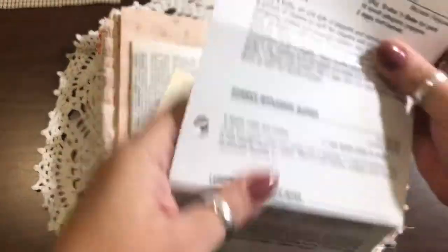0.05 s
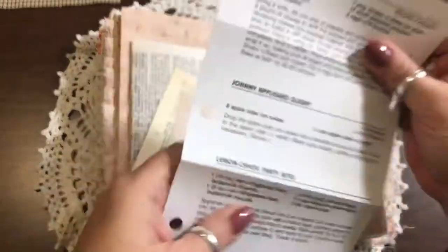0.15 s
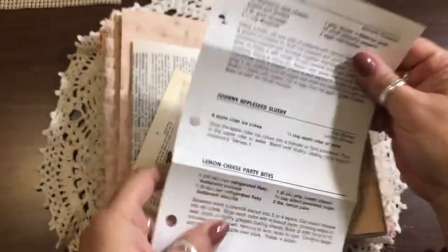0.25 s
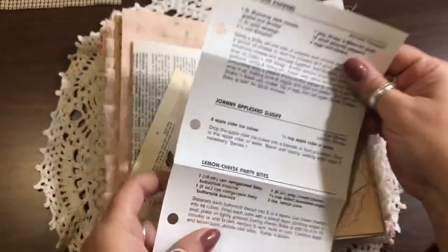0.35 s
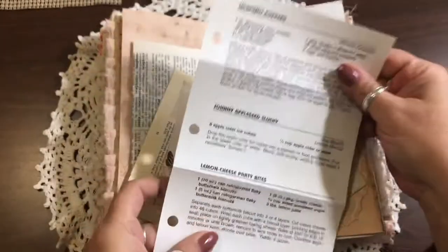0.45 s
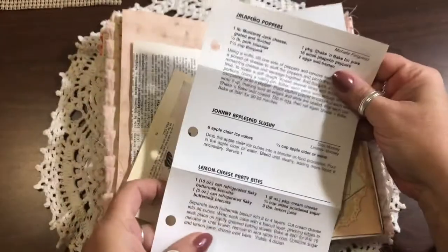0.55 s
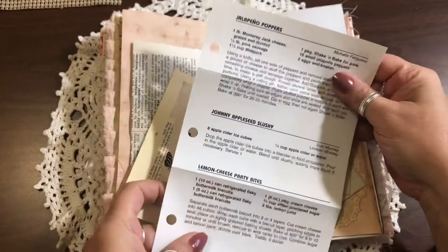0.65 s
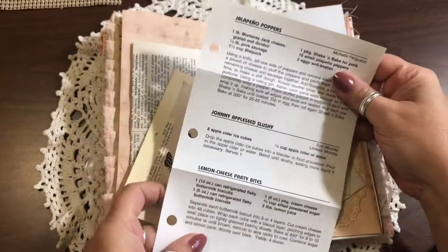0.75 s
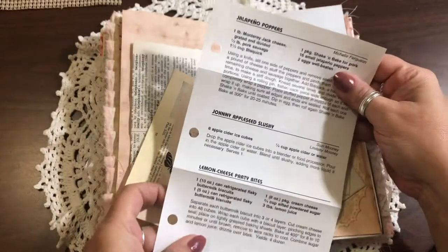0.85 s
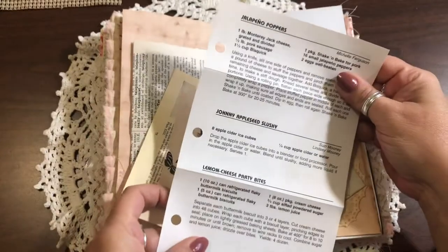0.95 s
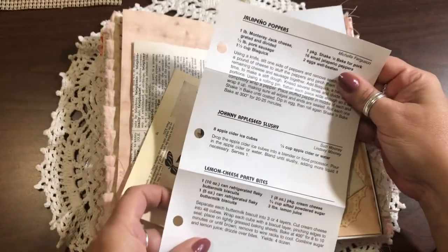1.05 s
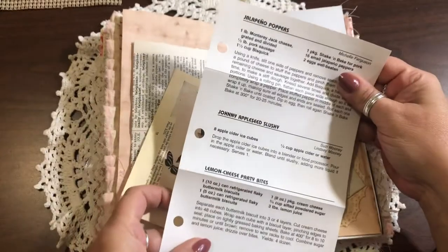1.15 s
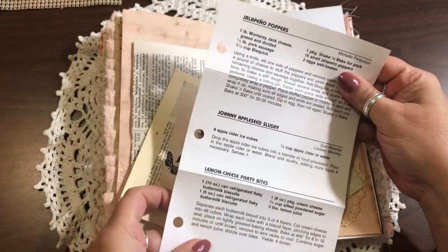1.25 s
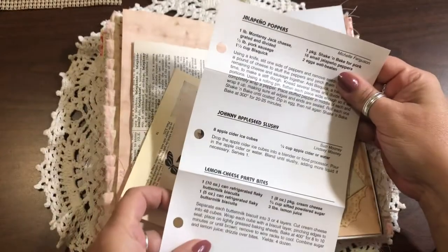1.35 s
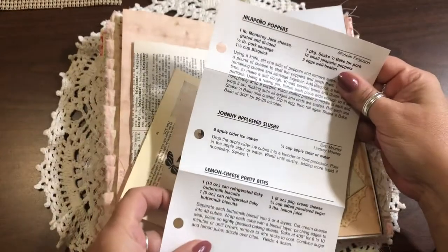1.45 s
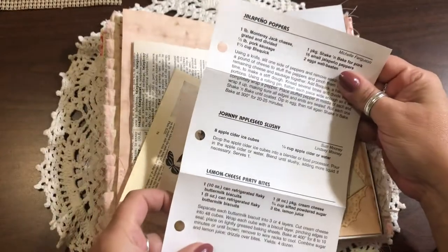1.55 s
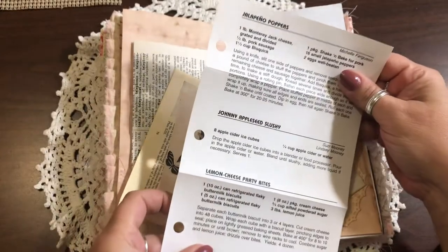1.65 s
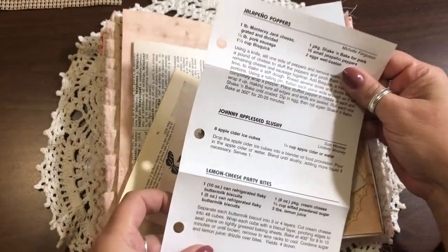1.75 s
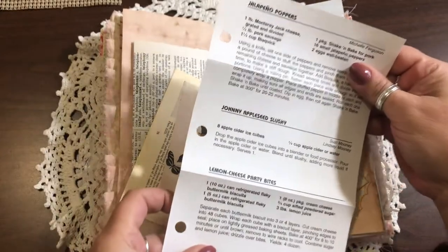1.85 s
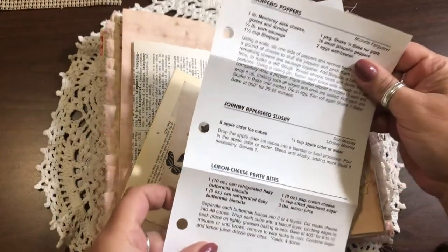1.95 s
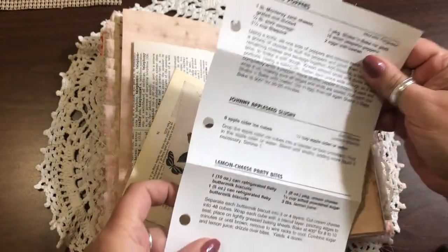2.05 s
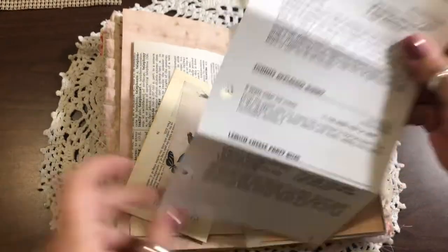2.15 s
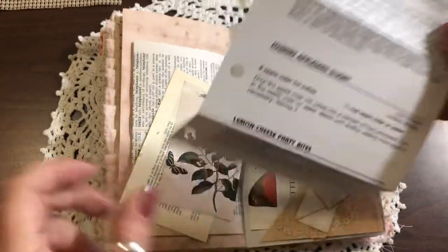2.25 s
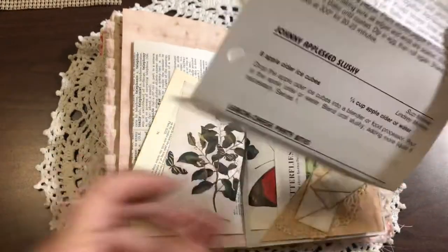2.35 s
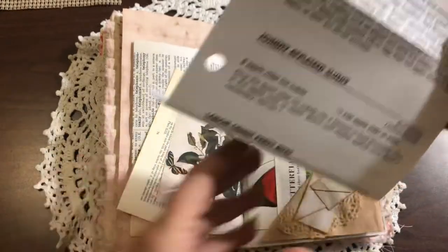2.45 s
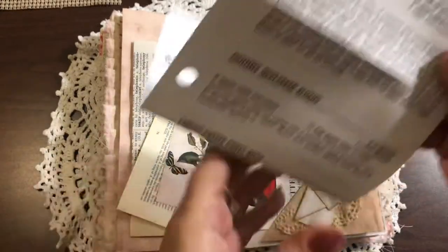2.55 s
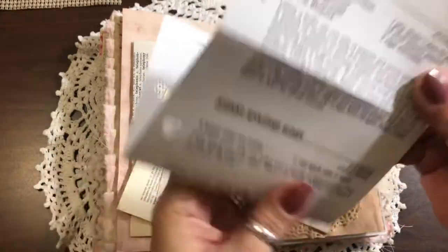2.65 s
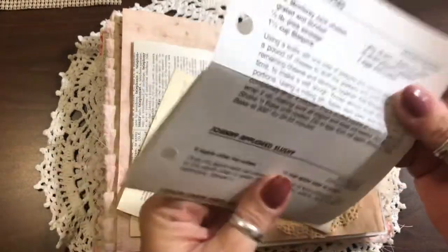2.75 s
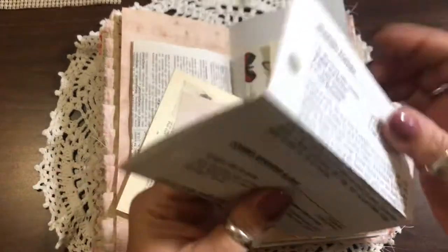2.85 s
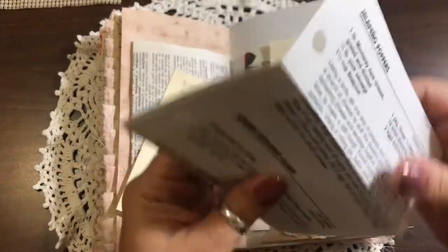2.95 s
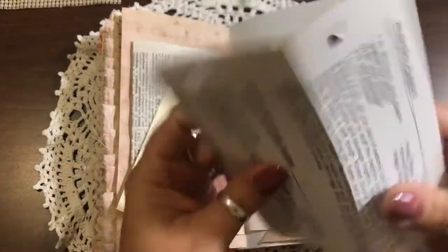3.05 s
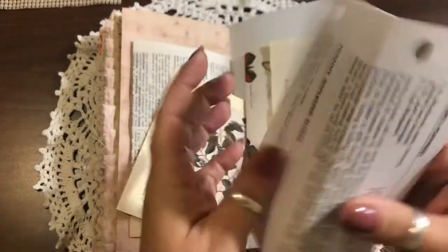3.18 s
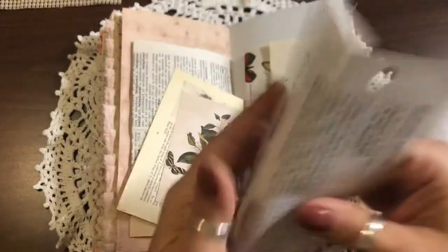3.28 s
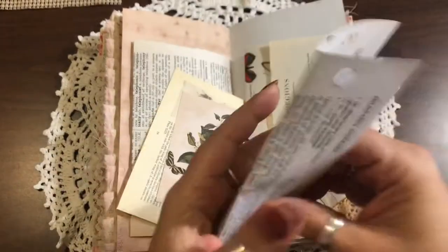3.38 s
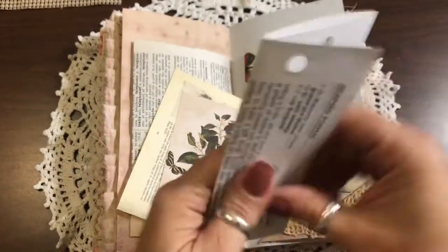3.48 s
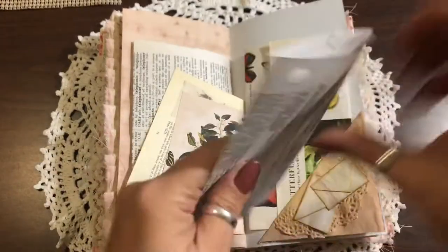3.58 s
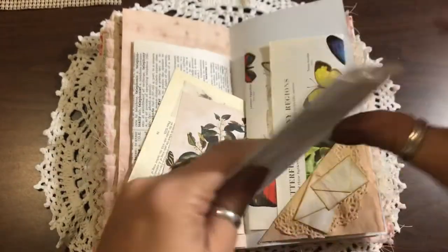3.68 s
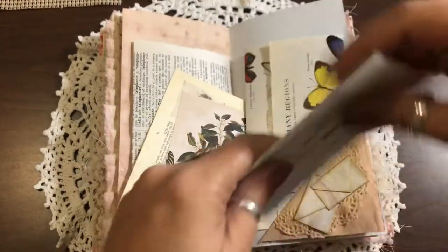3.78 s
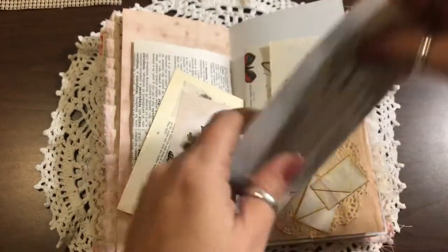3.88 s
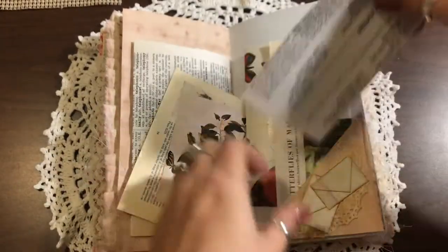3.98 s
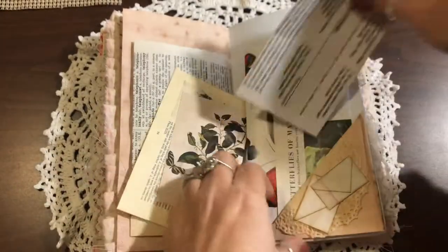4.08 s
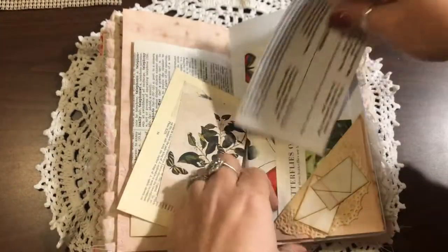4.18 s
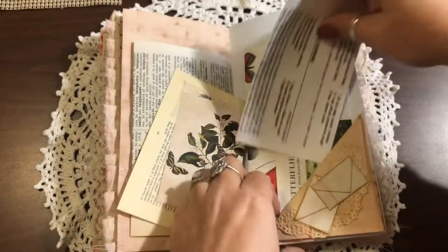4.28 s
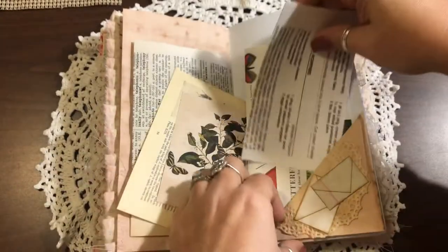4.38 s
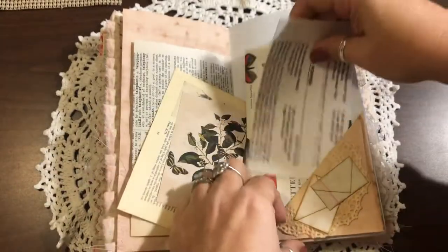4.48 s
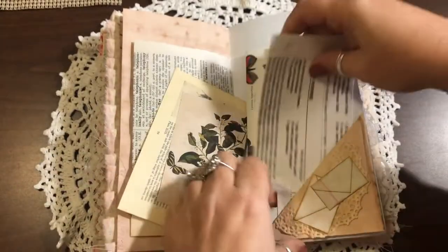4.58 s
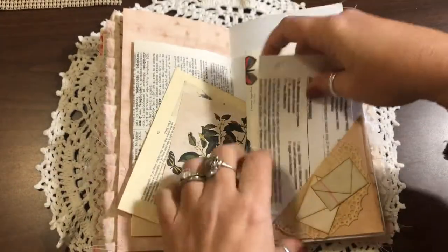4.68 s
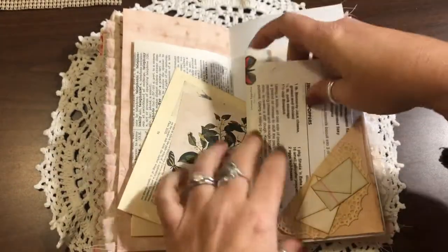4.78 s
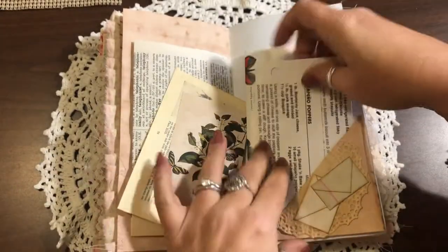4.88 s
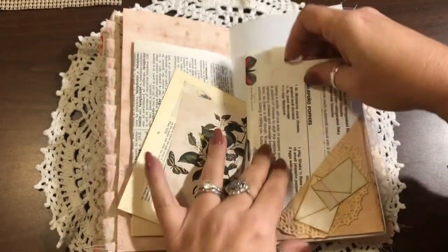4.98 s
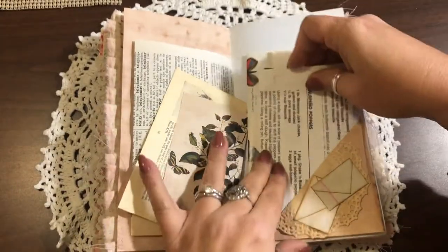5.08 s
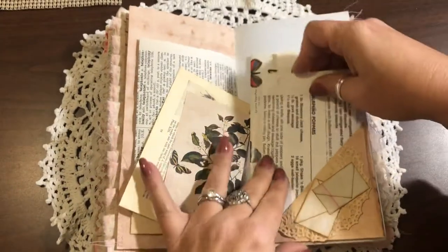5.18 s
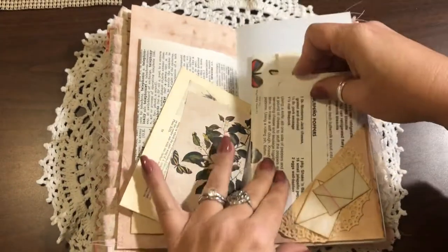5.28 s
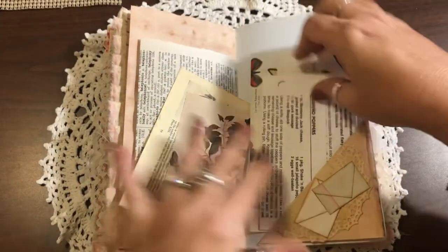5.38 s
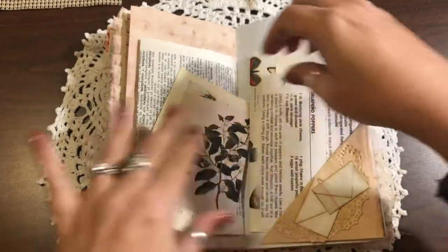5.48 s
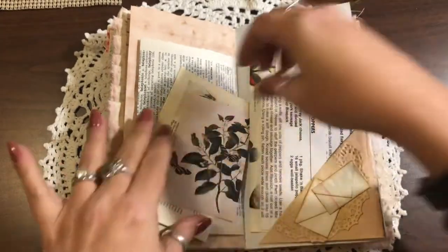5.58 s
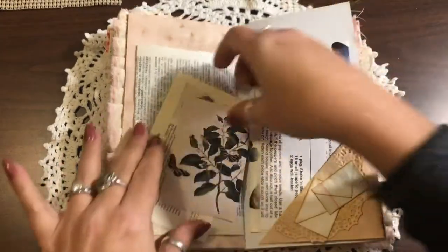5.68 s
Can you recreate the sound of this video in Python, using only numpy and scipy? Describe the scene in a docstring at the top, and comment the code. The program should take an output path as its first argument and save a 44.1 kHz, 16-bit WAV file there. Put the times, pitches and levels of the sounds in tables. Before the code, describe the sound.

A sheet of paper is lifted off a scrapbook with a hiss, a few flaps and soft hollow pops in the first half second. Faint rubbing fades to a lull from about 1 to 2 seconds, with a small tick near 1.8 seconds. From 2.1 seconds the sheet is flexed and folded, fluttering and crackling, and at 2.8 seconds a crease gives one sharp snap, the loudest sound. Busy flapping, crinkling and rubbing continue until about 3.6 seconds, then thin out, with a tap near 3.9. From about 4.2 to 4.8 seconds the folded sheet slides into a paper pocket with a dry, swelling scrape. Light fingertip taps and soft rubs follow around 5 seconds and die away by 5.7. Everything sounds close, in a small quiet room with a faint steady electrical hum.

```python
"""Paper hisses as a printed sheet is lifted off a scrapbook, then flexed, folded and slid into a pocket.
Stick-slip friction makes the hiss, and the pocket's resonances colour the closing scrape.
Buckling makes the sheet flutter, flap and pop; its creases crackle and one snaps through.
Fingertips and edges tap and tick. The table reflects it all, in a small quiet room with a faint mains hum."""
import sys
import numpy as np
from scipy import signal
from scipy.fft import rfft, irfft, next_fast_len
from scipy.io import wavfile
from scipy.ndimage import uniform_filter1d

SR = 44100
rng = np.random.default_rng(int(sys.argv[2]) if len(sys.argv) > 2 else 0)


def output_pcm(signal):
    """Save a mono or channel-first signal as 16-bit PCM at the path in sys.argv[1].

    Samples are clipped to [-1, 1] before scaling.
    """
    pcm = np.clip(np.atleast_2d(signal).T, -1, 1) * 32767
    wavfile.write(sys.argv[1], SR, np.round(pcm).astype(np.int16))


N = 252384
TIME = np.arange(N) / SR


def undb(db):
    """Amplitude ratio of a level in decibels."""
    return np.exp(np.asarray(db) * np.log(10) / 20)


def unit(x):
    """Normalisation to rms 1."""
    return x / np.sqrt(np.mean(x ** 2))


def fade(elapsed, t60):
    """Exponential decay: gain 1 until the elapsed time is 0, then 60 dB down every t60 seconds."""
    return np.exp(-np.log(1000) * np.maximum(elapsed, 0) / t60)


def colour(x, spectrum):
    """Spectral shaping by (frequency [Hz], gain [dB]) points, to rms 1."""
    hz, db = np.transpose(spectrum)
    size = next_fast_len(len(x), True)
    f = np.maximum(np.fft.rfftfreq(size, 1 / SR), 1)
    gain = undb(np.interp(np.log(f), np.log(hz), db))
    return unit(irfft(rfft(x, size) * gain, size)[:len(x)])


def ring(x, hz, width):
    """Second-order resonance with gain 1 at its centre."""
    hz = min(hz, SR / 3)
    w = 2 * np.pi * hz / SR
    a = np.sin(w) * width / hz / 2
    return signal.lfilter([a, 0, -a], [1 + a, -2 * np.cos(w), 1 - a], x)


def resonate(x, peaks):
    """Parallel filtering: the summed response of several ringing peaks."""
    return sum(undb(db) * ring(x, hz, width) for hz, width, db in peaks)


def soften(x, hz):
    """Contact compliance: a soft contact has little energy far above hz."""
    return signal.sosfilt(signal.butter(2, min(hz, .45 * SR), fs=SR, output="sos"), x)


def disperse(x, lag_s):
    """Dispersion of bending waves: low frequencies travel slower and arrive late (lag_s at 1 kHz)."""
    size = next_fast_len(len(x) + SR // 10, True)
    f = np.fft.rfftfreq(size, 1 / SR)
    phase = 4 * np.pi * lag_s * np.sqrt(1000 * f)
    return irfft(rfft(x, size) * np.exp(-1j * phase), size)[:len(x)]


def walk(rate):
    """Smooth random modulation of rms 1, with about `rate` turns a second."""
    hold = max(int(SR / rate), 1)
    steps = np.repeat(rng.standard_normal(N // hold + 1), hold)
    return unit(uniform_filter1d(steps, hold)[:N])


def slips(rate, scatter_db):
    """Poisson impulses: fibres catch and let go in uneven clicks, `rate` a second on average."""
    out = np.zeros(N)
    hit = rng.random(N) < rate / SR
    size, scatter = rng.standard_normal((hit.sum(), 2)).T
    out[hit] = size * undb(scatter_db * np.clip(scatter, -2, 2))
    return out


def add(track, sound, s, db):
    """Superposition of a short sound at time s, its loudest 10 ms at the given level."""
    start = int(s * SR)
    loudest = np.sqrt(uniform_filter1d(sound ** 2, SR // 100, mode="constant").max())
    track[start:start + len(sound)] += (sound * undb(db) / loudest)[:N - start]


def blow(hz, t60, tail_db, breadth, lag_s, sink, reach, give_s):
    """Transient excitation: paper gives way, then shivers lower. Breadth, sink and reach scale hz."""
    t = TIME[:SR // 4]
    force = (t == 0) + .18 * rng.standard_normal(len(t)) * np.exp(-t / give_s)
    hit = soften(ring(force, hz, breadth * hz), reach * hz)
    tremor = rng.standard_normal(len(t)) * fade(t, t60)
    shiver = soften(ring(tremor, sink * hz, breadth * hz), reach * sink * hz)
    return disperse(unit(hit) + undb(tail_db) * unit(shiver), lag_s)


# hand movements that rub paper on paper:
# (start [s], time to grip [s], length [s], level [dB], swell [dB], t60 [s], hiss over level [dB])
HAND_RUBS = [(0.0, 0.0027, 0.058, -49.3, 2.5, 0.48, -1.5), (0.122, 0.033, .13, -56.3, 1.5, .52, 3),
             (0.36, .015, 0.11, -63, -3, .4, -3.5), (0.494, .008, 0.13, -63, -4, .8, -4),
             (0.704, 0.066, 0.19, -65.3, -0.5, 0.43, -5), (2.034, .018, 0.058, -58.7, 6, 0.07, 3),
             (2.11, .003, 0.066, -45.5, 2.5, 0.04, -3.5), (2.2, .002, 0.028, -49.3, -2.5, 0.05, -1.5),
             (2.386, .01, 0.15, -67.5, 8, .08, -3), (2.553, .002, 0.022, -59, -4, .1, -7),
             (2.6, .025, 0.2, -55.5, 5, .3, -1.3), (2.768, .008, 0.049, -46, -3, 0.23, -1),
             (2.87, .01, 0.079, -63, 3, .2, 1), (2.96, .002, 0.13, -52, 4, 0.33, -2),
             (3.129, .01, 0.022, -51.5, 1.5, .17, -4), (3.231, 0.0026, 0.077, -48.5, 4.5, .2, -3),
             (3.324, .01, 0.083, -53.5, 1.5, .2, -4), (3.405, 0.0073, 0.066, -48, -2, 0.27, -2),
             (3.485, 0.013, 0.048, -50, 0, 0.14, 7.7), (3.679, .02, 0.054, -66, 5, 0.19, 3),
             (3.733, .015, 0.17, -61, 4, 0.31, 8.5), (4.985, .004, 0.06, -54.7, 2, .2, -6.5),
             (5.108, .04, .095, -54.3, -1, .24, -9), (5.25, .026, 0.086, -50.7, 1.5, 0.085, -1.3),
             (5.582, 0.011, 0.15, -64.5, 3, .2, -3)]
def friction_levels():
    """Incoherent sources add in power: rasp and hiss envelopes of rubs that grip, slide and fade."""
    rasp_power, hiss_power = np.zeros(N), np.zeros(N)
    for start, grip_s, length, db, swell_db, t60, hiss_db in HAND_RUBS:
        span = (TIME >= start) & (TIME < start + length + t60)
        t = TIME[span] - start
        attack = np.minimum(t / grip_s, 1)
        progress = np.minimum(t / length, 1)
        rub = attack * undb(db + swell_db * (progress - .5)) * fade(t - length, t60)
        rasp_power[span] += rub ** 2
        hiss_power[span] += (rub * undb(hiss_db)) ** 2
    return np.sqrt(rasp_power), np.sqrt(hiss_power)


# spectrum of sheet rubbing on sheet: (frequency [Hz], gain [dB])
RASP_SPECTRUM = [(200, -22.5), (550, -11.5), (800, -3.5), (1080, -11.5), (1550, 0.5), (2300, -2), (3200, 0),
                 (4500, -.5), (6500, -3.5), (8500, -10), (16000, -26)]
# spectrum of a scraping edge: (frequency [Hz], gain [dB])
HISS_SPECTRUM = [(3000, -27), (6000, -1.5), (8000, 0.5), (11000, -1.5), (15500, 0)]
def sliding(rasp_level, hiss_level):
    """Stick-slip friction: sheet on sheet gives a papery rasp, a scraping edge a high hiss."""
    grip = undb(1.1 * walk(45) + walk(260))
    friction = colour(slips(rate=20000, scatter_db=2) * grip, RASP_SPECTRUM)
    # resonances come and go as the sheet's curve and the contact point change
    rasp_modes = sum(.27 * walk(14) * ring(friction, hz, .23 * hz) for hz in np.geomspace(600, 12000, 11))
    rasp = unit(friction + rasp_modes)
    scrape = colour(slips(rate=14000, scatter_db=2.4) * grip, HISS_SPECTRUM)
    hiss_modes = sum(.35 * walk(14) * ring(scrape, hz, .13 * hz) for hz in np.geomspace(6000, 14000, 6))
    hiss = unit(scrape + hiss_modes)
    return rasp * rasp_level * undb(-1) + hiss * hiss_level * undb(.2)


def crinkling(rasp_level, rate=170, floor_db=-75):
    """Local buckling: small facets click at their own pitches, louder the harder the sheet is rubbed."""
    facets_hz = np.geomspace(1800, 11000, 9)
    cracks = sum(ring(slips(rate / len(facets_hz), scatter_db=3.5), hz, .2 * hz) / np.sqrt(hz)
                 for hz in facets_hz)
    effort = np.maximum(rasp_level, undb(floor_db))
    return unit(disperse(cracks, lag_s=.0003)) * effort * undb(-13.5)


# bends of the sheet: (time of deepest bend [s], level [dB], build-up t60 [s], decay t60 [s])
SHEET_BENDS = [(0.03, -45, 0.44, 0.55), (0.22, -59, 0.46, .75), (2.25, -50.5, .42, .33),
               (2.465, -48, .12, 0.52), (2.70, -51.5, 0.65, 0.26), (2.812, -44.5, 0.26, 0.19),
               (3.066, -43, .4, .31), (3.292, -44.5, 0.36, 0.2), (3.425, -46.5, 0.066, 0.49),
               (3.53, -52, .4, 0.27), (3.765, -54.5, 0.13, 0.23), (3.965, -58, .4, 0.21),
               (4.23, -62, .4, 0.27), (5.19, -62, 0.82, 0.43), (5.66, -68, .6, .9)]
# spectrum of the flutter: (frequency [Hz], gain [dB])
FLUTTER_SPECTRUM = [(30, -15), (60, -2), (100, 1), (150, 1), (250, 1), (400, -2.5), (560, -0.5), (750, -3),
                    (1100, -14.5), (2000, -25.5), (5000, -45.5)]
def flexing(rasp_level, held_db=-76, drag_db=-18.5):
    """Flexural vibration: soft bucklings stir the low, broad modes as the sheet is bent or dragged."""
    power = undb(held_db) ** 2 + (undb(drag_db) * rasp_level) ** 2
    for s, db, build_s, decay_s in SHEET_BENDS:
        span = (TIME > s - build_s) & (TIME < s + decay_s)
        t = TIME[span] - s
        power[span] += (undb(db) * fade(-t, build_s) * fade(t, decay_s)) ** 2
    flutter = disperse(slips(rate=1500, scatter_db=2.5), lag_s=.001204)
    return colour(flutter, FLUTTER_SPECTRUM) * np.sqrt(power) * undb(-1.5)


# spectrum of still room air: (frequency [Hz], gain [dB])
AIR_SPECTRUM = [(25, -17.5), (55, -1), (90, -2), (170, -4), (250, -6), (500, -12), (1200, -13), (2000, -20),
                (4000, -23.5), (8000, -26), (15500, -29.5)]
def background(air_db=-69.5, hum_hz=119.7, hum_db=-67.6):
    """Ambient noise floor: broadband room air and a mains hum, both wavering slightly in level."""
    air = colour(rng.standard_normal(N), AIR_SPECTRUM) * undb(air_db + .5 * walk(4.7))
    hum = np.sqrt(2) * np.sin(2 * np.pi * hum_hz * TIME) * undb(hum_db + .87 * walk(3.5))
    return air + hum


# flaps of the sheet: (time [s], relative level [dB], centre [Hz])
SHEET_FLAPS = [(0.014, -40.5, 660), (0.043, -46.5, 520), (0.152, -47.5, 450), (0.202, -39.5, 1000),
               (0.238, -46, 1050), (0.246, -47, 760), (0.637, -61.5, 350), (2.091, -52.5, 900),
               (2.243, -44, 900), (2.334, -56, 720), (2.425, -41, 290), (2.435, -38, 1200),
               (2.486, -49.5, 950), (2.797, -39, 380), (2.998, -41.5, 560), (3.027, -44.5, 290),
               (3.065, -39, 950), (3.085, -46, 600), (3.236, -48, 360), (3.261, -48, 600),
               (3.276, -45.5, 290), (3.304, -42.5, 560), (3.418, -40.5, 650), (3.45, -47, 600),
               (3.489, -50, 300), (3.551, -53, 470), (3.764, -50, 320), (3.782, -56, 400),
               (3.977, -60, 250), (4.041, -55, 450), (4.205, -56, 820), (4.768, -56, 600),
               (4.952, -58, 260), (4.987, -54.5, 800)]
# low modes of the held sheet: (frequency [Hz], bandwidth [Hz], gain [dB])
HELD_MODES = [(258, 110, -1), (525, 80, -8), (620, 60, -10), (737, 80, -8)]
def flapping():
    """Modal response: a flap moves the whole sheet, which answers in its broad drum-like modes."""
    direct = np.zeros(N)
    for s, db, hz in SHEET_FLAPS:
        flap = blow(hz, t60=.085, tail_db=3.5, breadth=1, lag_s=.0013, sink=.91, reach=1.82, give_s=.0017)
        add(direct, flap, s, db)
    return undb(-2.5) * (direct + resonate(direct, HELD_MODES))


# pops of the cupped sheet: (time [s], level [dB], pitch [Hz], t60 [s])
HOLLOW_POPS = [(0.04, -46, 500, .08), (0.154, -43.5, 430, .08), (0.204, -45.5, 420, .08),
               (0.248, -50, 630, .08), (2.218, -49, 520, .14), (2.244, -41.5, 560, .06),
               (2.266, -52, 520, .14), (2.428, -42, 730, .06), (3.05, -45, 530, .08),
               (3.075, -47, 610, .07), (3.168, -55, 450, .08), (3.451, -50, 530, .06)]
def popping(width_hz=150, sag=.08):
    """Cavity resonance: air under the popping sheet rings hollow; the pitch sags as the sheet relaxes."""
    out, t = np.zeros(N), TIME[:SR // 4]
    for s, db, hz, t60 in HOLLOW_POPS:
        pitch = hz * (1 - sag * (1 - fade(t, t60)) + sag / 2)
        attack = 1 - np.exp(-t / .001)
        note = np.sin(2 * np.pi * np.cumsum(pitch) / SR) * fade(t, t60 / 2) * attack
        flutter = ring(rng.standard_normal(len(t)) * fade(t, t60), hz, width_hz)
        add(out, unit(note) + undb(-3) * unit(ring(flutter, hz, 2 * width_hz)), s, db)
    return out


# strokes along the paper: (start [s], end [s], level [dB], centre [Hz], bandwidth [Hz])
PATCH_STROKES = [(0.13, 0.385, -55.5, 5750, 1250), (0.26, 0.76, -67, 1200, 1400),
                 (0.27, 0.72, -66.8, 6050, 1000), (0.66, 1.05, -66.5, 1100, 1400),
                 (0.70, 0.968, -65.5, 6160, 1200), (1.382, 1.558, -72, 1200, 1200),
                 (2.098, 2.256, -54.5, 650, 500), (3.872, 4.003, -60, 1200, 1200),
                 (3.923, 3.983, -52, 5200, 1400), (4.047, 4.3, -67, 810, 300), (3.99, 4.5, -63, 1700, 550),
                 (4.09, 4.3, -64, 5800, 2000), (4.25, 4.37, -62, 6900, 1600), (4.43, 4.53, -59, 8600, 2500),
                 (4.71, 4.78, -58, 8800, 2500), (4.92, 5.42, -63.5, 1300, 1300),
                 (4.697, 4.97, -60.5, 3160, 1200), (5.426, 5.725, -73, 1100, 1400)]
def strokes():
    """Forced resonance: a chattering fingertip or edge rings the patch under it in a whispering band."""
    out = np.zeros(N)
    for start, end, db, hz, width in PATCH_STROKES:
        arch = np.sin(np.pi * np.clip((TIME - start) / (end - start), 0, 1))
        patch = ring(slips(rate=9000, scatter_db=2), hz, width)
        out += undb(db) * arch * unit(ring(patch, hz, 2 * width))
    return out


# creases and edges giving way: (time [s], relative level [dB], centre [Hz])
CREASE_CRACKS = [(0.202, -50.5, 3500), (2.112, -51, 3100), (2.201, -49, 3500), (2.4235, -42.5, 3400),
                 (2.429, -38.5, 1640), (2.612, -59, 5700), (2.642, -54, 3400), (2.669, -47, 3750),
                 (2.69, -51, 4050), (2.759, -42, 2400), (2.775, -40, 4300), (2.781, -44, 1600),
                 (2.808, -43, 3500), (2.827, -41, 2050), (2.962, -56, 7000), (2.998, -46, 1700),
                 (2.999, -42, 6400), (3.067, -44.5, 1750), (3.144, -51, 4500), (3.232, -48, 3200),
                 (3.259, -37.5, 6000), (3.262, -41, 3000), (3.283, -45, 5500), (3.308, -48, 2000),
                 (3.417, -41.5, 4500), (3.419, -45, 1700), (3.484, -46, 3800), (3.521, -48, 3000),
                 (3.756, -53, 4500), (3.764, -51, 7000), (4.042, -56, 2300)]
def crackling(facet_db=1.5):
    """Impulse excitation: a crease gives with a broad crack and the facet beside it rings."""
    out = np.zeros(N)
    for s, db, hz in CREASE_CRACKS:
        crack = blow(hz, t60=.045, tail_db=3, breadth=1.6, lag_s=.0005, sink=.81, reach=2.77, give_s=.0036)
        add(out, crack + undb(facet_db) * ring(crack, hz, .12 * hz), s, db)
    return undb(-1) * out


# an edge flicks off a nail or another edge: (time [s], level [dB], bright crack over ring [dB])
EDGE_FLICKS = [(1.7672, -51.5, -3), (1.783, -56.5, 7), (2.4235, -49, 0), (2.482, -53, 3), (2.999, -47, 9),
               (3.2595, -41, 8), (4.084, -60.5, 4), (5.096, -67, 3), (5.196, -61, 8), (5.34, -55, 5)]
# modes of the flicked edge: (frequency [Hz], bandwidth [Hz], gain [dB])
FLICK_MODES = [(1500, 400, -6), (2450, 200, 0), (3500, 400, 2), (4300, 400, -2)]
def ticks(give_s=.001, shiver_t60=.2, shiver_db=-12):
    """Free vibration: a released edge cracks brightly, rings briefly and sets the sheet shivering."""
    out, t = np.zeros(N), TIME[:SR // 4]
    impulse = unit(1. * (t == 0))
    for s, db, bright_db in EDGE_FLICKS:
        crack = unit(rng.standard_normal(len(t)) * np.exp(-t / give_s))
        shiver = undb(shiver_db) * unit(rng.standard_normal(len(t)) * fade(t, shiver_t60))
        edge = unit(resonate(impulse + shiver, FLICK_MODES))
        bright = unit(ring(crack + shiver, hz=9000, width=20000))
        add(out, edge + undb(bright_db) * bright, s, db)
    return out


# the snap of the fold: (time [s], level [dB], rise constant [s], fall constant [s])
FOLD_SNAP = (2.7978, -24.0, .0027, .0012)
# ringing, comb-like peaks that colour the snap: (frequency [Hz], bandwidth [Hz], gain [dB])
SNAP_PEAKS = [(2000, 160, 0), (3380, 360, 8.5), (3970, 240, 3.5), (4520, 340, 0.5), (5680, 280, 1),
              (6210, 310, 1.5), (7700, 400, -9)]
def snap(lead_s=.01):
    """Snap-through instability: tiny bucklings pile up until the fold jumps in one ringing crack."""
    s, db, rise_s, fall_s = FOLD_SNAP
    lead = round(lead_s * SR)
    t = TIME[:6 * lead] - TIME[lead]
    avalanche = rng.choice([-1., 1.], len(t)) * np.exp(np.minimum(t / rise_s, -t / fall_s))
    crack = unit(1. * (t == 0)) + undb(-6) * unit(avalanche)
    ringing = unit(soften(resonate(crack, SNAP_PEAKS), 8000))
    # the small bucklings also fizz in the treble
    rustle = unit(soften(ring(avalanche, hz=4400, width=3500), 9000))
    fizz = unit(rustle + undb(-12) * unit(ring(avalanche, hz=14000, width=5000)))
    out = np.zeros(N)
    add(out, disperse(ringing + undb(-3.5) * fizz, lag_s=.0004), s - lead_s, db)
    return out


# taps on the paper: (time [s], level [dB], centre [Hz])
PAPER_TAPS = [(3.8635, -47.5, 3600), (4.236, -55.5, 2000), (4.767, -48, 2400), (4.9453, -43.3, 1350),
              (5.095, -55.5, 2200), (5.195, -60, 3000), (5.299, -55, 1000), (5.339, -56, 1300),
              (5.349, -55.5, 350)]
def tapping():
    """Damped impact: fingertips and edges strike paper that lies flat, so the sound dies at once."""
    out = np.zeros(N)
    for s, db, hz in PAPER_TAPS:
        tap = blow(hz, t60=.035, tail_db=-14, breadth=2.3, lag_s=.003, sink=.61, reach=1.75, give_s=.0002)
        add(out, tap, s, db)
    return out


# the push into the pocket: (time [s], relative level [dB], hiss over scrape [dB])
POCKET_PUSH = [(4.0, -67, -7), (4.164, -58.5, -13), (4.288, -54.3, -7), (4.418, -55.5, -11),
               (4.475, -46.8, -8), (4.54, -47.3, -7), (4.6, -43.3, -4), (4.68, -48.5, -7.5),
               (4.745, -48.3, -4), (4.795, -61, -1), (4.904, -58, 1), (4.95, -61, -1)]
# spectrum of the scrape along the pocket: (frequency [Hz], gain [dB])
SCRAPE_SPECTRUM = [(200, -16), (600, -11), (1200, -7), (2400, -1), (4500, 0), (6500, -2), (8500, -8),
                   (16000, -24)]
# hollow modes of the pocket: (frequency [Hz], bandwidth [Hz], gain [dB])
HOLLOW_MODES = [(820, 130, 2), (1480, 220, 2.5), (1760, 200, 0), (3500, 500, -5)]
def pocket(fade_t60=.3, snag_db=-10, shift_db=1.7, shift_rate=18):
    """Source and filter: the folded sheet scrapes in, snags on the lip and drives the pocket's modes."""
    times, levels, hiss_levels = np.transpose(POCKET_PUSH)
    outside_s = np.maximum(times[0] - TIME, TIME - times[-1])
    push = undb(np.interp(TIME, times, levels)) * fade(outside_s, fade_t60)
    grip = undb(.5 * walk(45) + 1.2 * walk(260))
    friction = colour(slips(rate=14000, scatter_db=2) * grip, SCRAPE_SPECTRUM)
    snags = colour(disperse(slips(rate=520, scatter_db=1.5), lag_s=.0006), SCRAPE_SPECTRUM)
    scrape = friction + undb(snag_db) * snags
    hollow = unit(scrape + resonate(scrape, HOLLOW_MODES))
    hiss = colour(slips(rate=9000, scatter_db=2.2) * grip, HISS_SPECTRUM)
    rub = hollow + undb(np.interp(TIME, times, hiss_levels)) * hiss
    # the colour shifts band by band as the contact moves
    shift = sum((undb(shift_db * walk(shift_rate)) - 1) * ring(rub, hz, .15 * hz)
                for hz in np.geomspace(1200, 14000, 14))
    return push * (rub + shift) * undb(-.2)


def table_and_room(x, bounce_s=.0017, bounce=.23, room_t60=.23, room_db=-20):
    """Reflection: a table bounce whose lag shifts as the hands move, then short, dull reverberation."""
    lag = bounce_s * undb(2.5 * walk(3))
    near = x + bounce * np.interp(TIME - lag, TIME, x)
    t = TIME[:SR // 2]
    tail = ring(rng.standard_normal(len(t)), hz=500, width=2200) * fade(t, room_t60) * (t > .005)
    return near + undb(room_db) * signal.fftconvolve(near, tail / np.linalg.norm(tail))[:N]


def scene():
    """Superposition: all the paper sounds above the table, over the quiet room."""
    rasp, hiss = friction_levels()
    taps = tapping()
    rubbing = sliding(rasp, hiss) + pocket() + strokes() + crinkling(rasp)
    bending = flexing(rasp) + flapping() + popping() + crackling() + snap()
    return (table_and_room(rubbing + bending + taps + ticks()) + background())[None]


def record(dry, bass_hz=45, top_hz=15900):
    """Band limiting: the microphone loses the deepest bass, and the top is cut steeply."""
    thin = signal.sosfilt(signal.butter(2, bass_hz, "high", fs=SR, output="sos"), dry)
    return signal.sosfilt(signal.ellip(10, .1, 80, top_hz, fs=SR, output="sos"), thin)


dry = scene()
out = record(dry)
output_pcm(out)
```